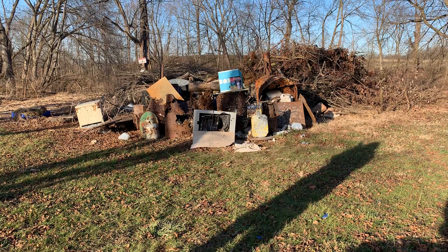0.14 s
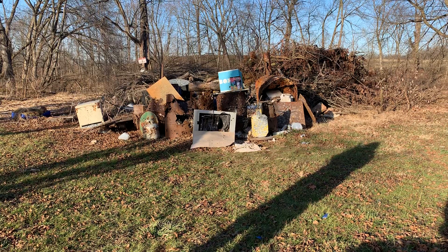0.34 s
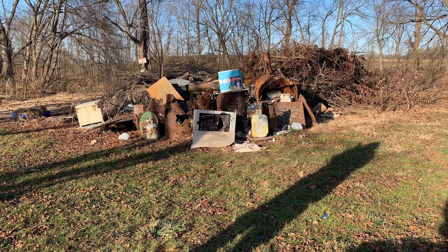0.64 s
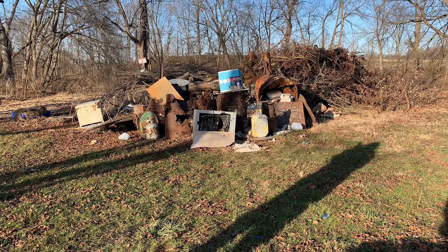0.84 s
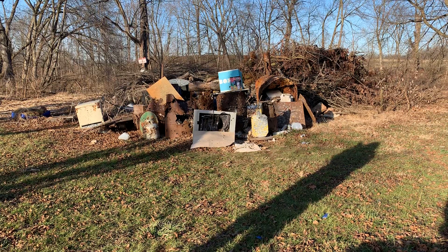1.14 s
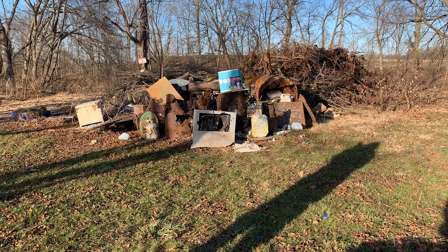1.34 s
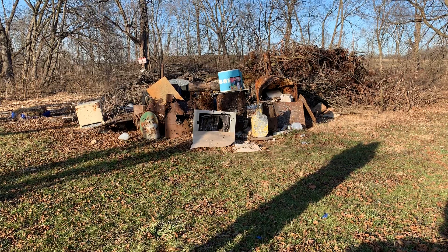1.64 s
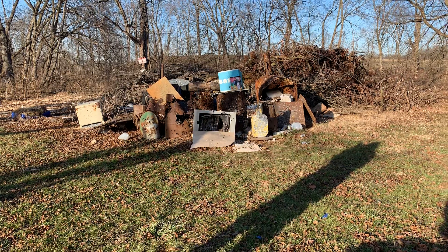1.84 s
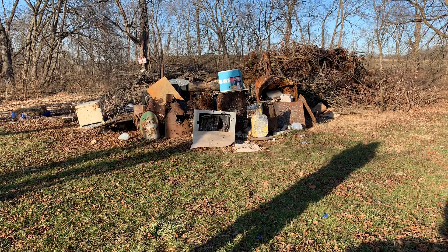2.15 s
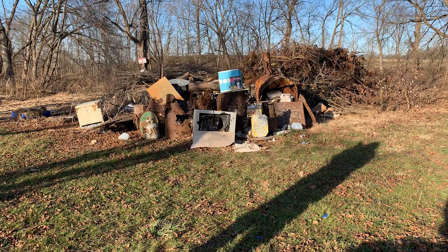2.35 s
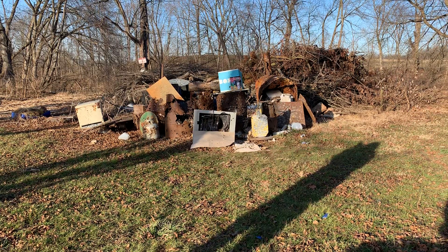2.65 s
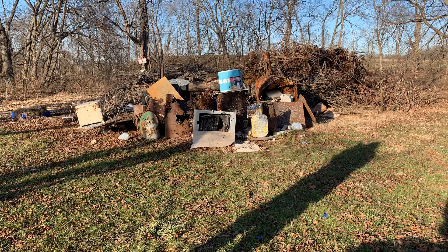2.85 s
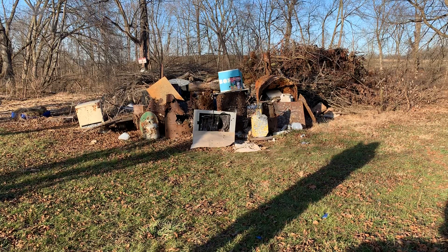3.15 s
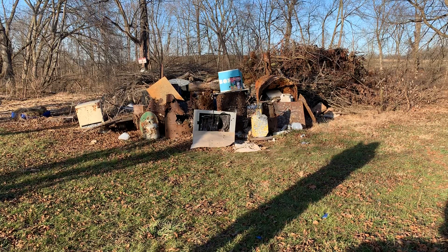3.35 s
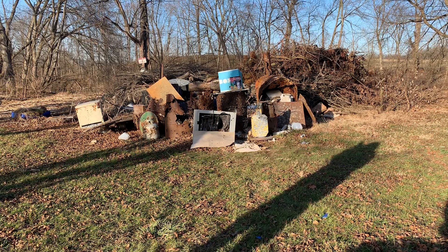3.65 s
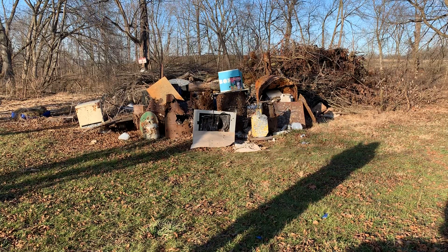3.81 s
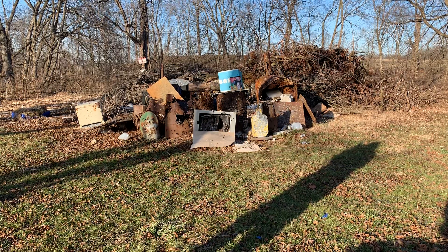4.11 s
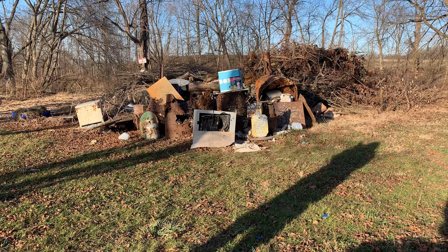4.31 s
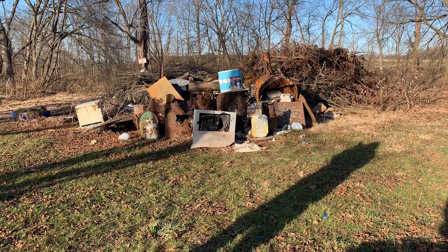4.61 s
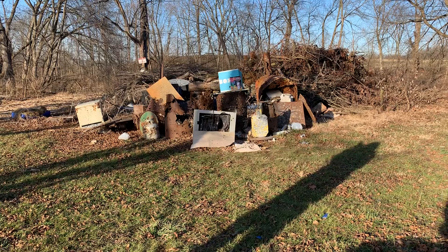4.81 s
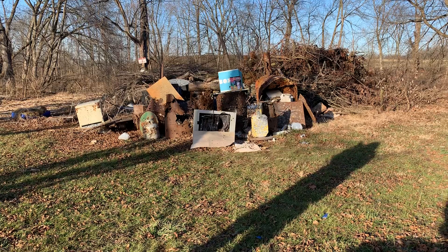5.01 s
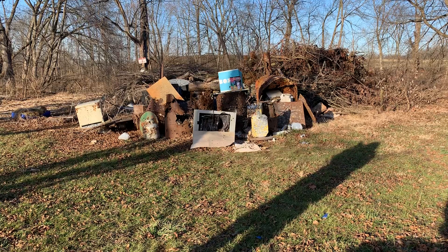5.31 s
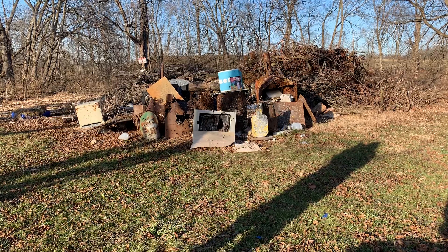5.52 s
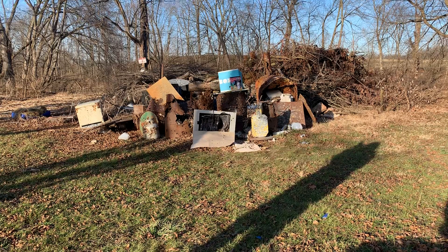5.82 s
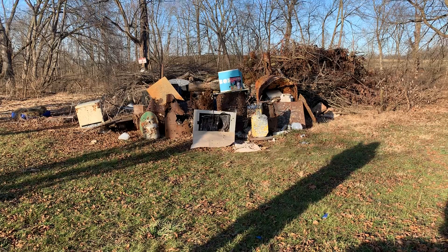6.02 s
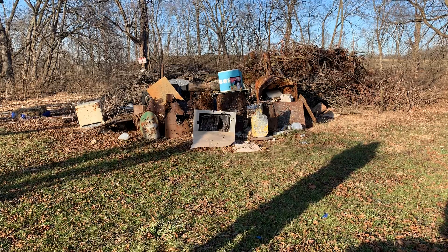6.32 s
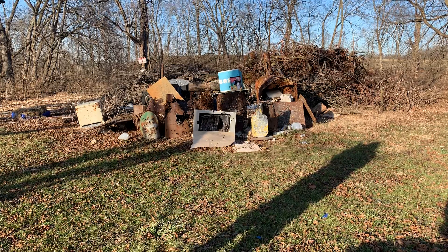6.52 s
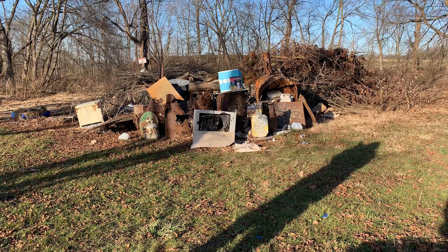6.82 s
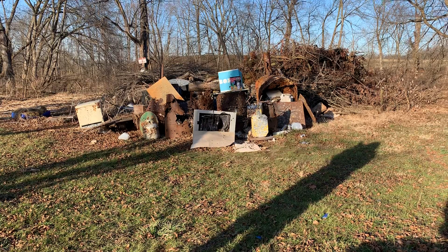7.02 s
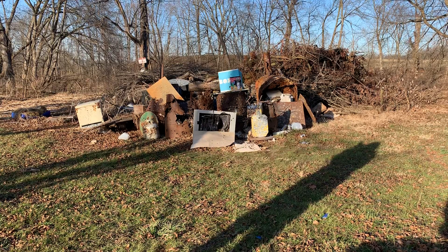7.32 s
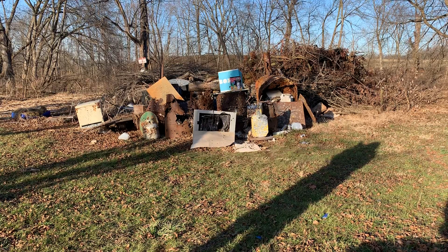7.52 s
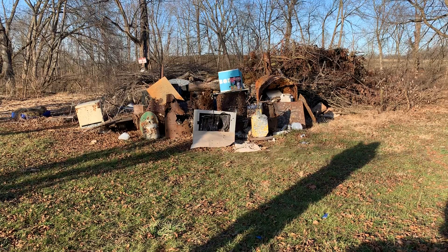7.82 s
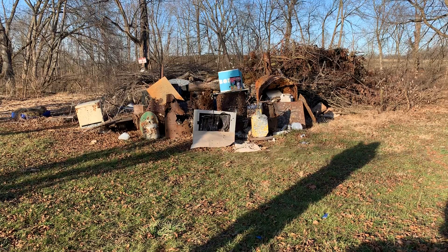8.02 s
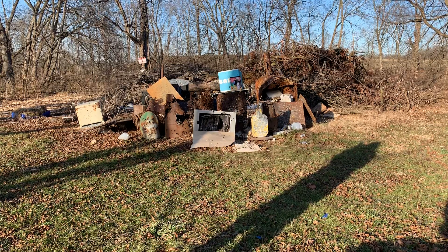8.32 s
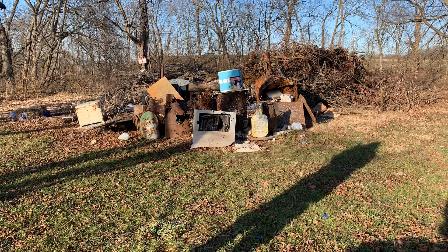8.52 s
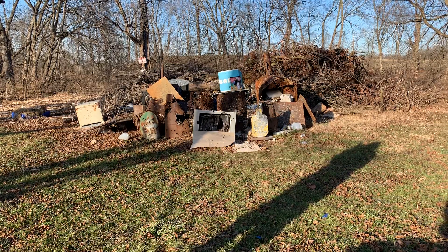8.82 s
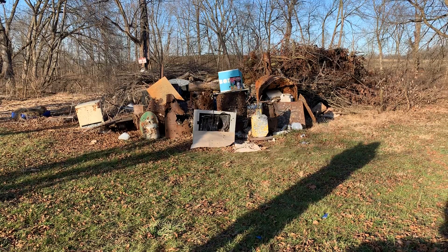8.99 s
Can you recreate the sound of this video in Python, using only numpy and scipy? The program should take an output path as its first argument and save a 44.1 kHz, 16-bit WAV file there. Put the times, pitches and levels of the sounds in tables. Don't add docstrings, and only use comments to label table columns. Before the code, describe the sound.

A small revolver is cocked and fired three times at a junk pile by bare trees, cracks and short scattered echoes over distant road noise.

```python
import sys
import numpy as np
from scipy import signal
from scipy.fft import irfft
from scipy.io import wavfile

SR = 44100
rng = np.random.default_rng(int(sys.argv[2]) if len(sys.argv) > 2 else 0)


def inscribe(sig):
    pcm = np.round(np.clip(np.atleast_2d(sig).T, -1, 1) * 32767)
    wavfile.write(sys.argv[1], SR, pcm.astype(np.int16))


def makeup_ratio(level_db):
    decades = np.asarray(level_db, float) / 20
    return 10 ** decades


N = 403515
RUN_IN = SR
LENGTH = N + RUN_IN
GAIN_DROP_S, GAIN_DROP_DB = 3.12, -14


def at_hz(points, hz):
    table_hz, value = np.transpose(points)
    return np.interp(np.log(hz), np.log(table_hz), value)


def rms_one(x):
    return x / np.sqrt(np.mean(x ** 2) + 1e-20)


def pan(left_db):
    return makeup_ratio(np.array([[left_db / 2], [-left_db / 2]]))


def add(out, x, s):
    i = round(s * SR) + RUN_IN
    out[:, i:i + x.shape[1]] += x[:, :LENGTH - i]


def resonate(x, hz, width_hz):
    r = np.exp(-np.pi * width_hz / SR)
    zeros = np.array([1, 0, -1]) * (1 - r * r) / 2
    poles = [1, -2 * r * np.cos(2 * np.pi * hz / SR), r * r]
    return signal.lfilter(zeros, poles, x)


def low_pass(x, hz, order):
    return signal.sosfilt(signal.butter(order, min(hz, .45 * SR), fs=SR, output="sos"), x)


def burst(noise, t60):
    return noise * makeup_ratio(-60 * np.arange(noise.shape[-1]) / SR / t60)


def drift(rate_hz, size):
    knots = rng.standard_normal(int(size / SR * rate_hz) + 2)
    return np.interp(np.arange(size) / SR * rate_hz, np.arange(len(knots)), knots)


# (frequency [Hz], likeness [-1..1])
LIKENESS_HZ = [(60, 0.9), (130, 0.8), (290, 0.14), (640, -0.44), (1410, -0.27), (3100, 0.19), (6820, -0.85),
               (15000, -0.096)]


def banded(white, spectrum, patchy_db, flicker_hz=9.1, loss_db_s=((20, 0), (20000, 0))):
    out, size, power = 0, white.shape[-1], 0
    later_s = np.arange(size) / SR - .1
    edges_hz = 22 * 2 ** np.arange(0, 9.7, 1 / 3)
    for k, (low, high) in enumerate(zip(edges_hz, edges_hz[1:])):
        hz = np.sqrt(low * high)
        band = signal.butter(2, [low, high], "band", fs=SR, output="sos")
        mid, side = signal.sosfilt(band, white[k % 2])
        alike = np.clip(at_hz(LIKENESS_HZ, hz), -1, 1)
        level_db = at_hz(spectrum, hz)
        gain = makeup_ratio(level_db + patchy_db * drift(flicker_hz, size) - at_hz(loss_db_s, hz) * later_s)
        out = out + gain * (np.sqrt(1 + alike) * mid + np.sqrt(1 - alike) * side * [[1], [-1]])
        power += makeup_ratio(level_db) ** 2 * (high - low) * 4 / SR
    return out / np.sqrt(power)


# (time [s], thump [dB], crack [dB], gas hiss [dB], thump off the pile [dB])
SHOTS = [
    (3.1224, 35.5, -4.5, -26.5, 3.5),
    (5.5037, 37.5, -6.5, -18, 23),
    (7.8212, 38, -5, -19, 24),
]
# (frequency [Hz], density [dB per Hz])
BLAST_HZ_DB = [(290, -32), (500, 0.5), (1600, -4), (1820, -20.5), (2100, -8), (3700, -23.5), (4280, -21.5),
               (4730, -22), (8700, -25), (10400, -24), (16000, -34.5)]
# (blast time [s], left [dB], right [dB])
RECOVERY = [(3.1205, -21.5, -29), (5.5055, -28.5, -33.5), (7.8215, -41.5, -30)]
EARLIER_S, EARLIER_ECHO_DB, ECHO_DB = -.4590, 13, 0.23
CRACK_LEAD_S = .0012
SPIT_DB, GAS_S = -7, .0065


def revolver():
    out, low, echoes, t = np.zeros((2, LENGTH)), thump(), landscape(), np.arange(6000) / SR
    shock = resonate(t == 0, 1400.0, 2000.0)
    add(out, makeup_ratio(EARLIER_ECHO_DB) * echoes, EARLIER_S)
    for s, thump_db, crack_db, hiss_db, pile_db in SHOTS:
        gas = banded(rng.standard_normal((2, 2, 6000)), BLAST_HZ_DB, 0)
        crack = burst(gas, 0.012) - 2.3 * shock * pan(4)
        treble = np.diff(gas[0] + .3 * gas, 2, prepend=[[0, 0]] * 2)
        spit = burst(rms_one(low_pass(treble, 14600, order=12)), .012) * np.minimum(t / .001, 1)
        crack = crack + makeup_ratio(SPIT_DB) * spit
        jet = np.diff(gas[:, ::-1], prepend=0) + .12 * gas
        hiss = rms_one(low_pass(jet, 14000, order=8)) * t / GAS_S * np.exp(1 - t / GAS_S)
        add(out, makeup_ratio(crack_db) * crack + makeup_ratio(hiss_db) * hiss, s - CRACK_LEAD_S)
        add(out, makeup_ratio(thump_db) * low, s)
        add(out, makeup_ratio(pile_db) * low_pass(low, 120., order=2), s + .024)
        add(out, makeup_ratio(ECHO_DB) * echoes, s - CRACK_LEAD_S)
    for s, left_db, right_db in RECOVERY:
        add(out, makeup_ratio(np.array([[left_db], [right_db]])) * t / .013 * np.exp(1 - t / .013), s + .006)
    return out


# (delay [s], lowest all-pass [Hz], highest all-pass [Hz], bass resonance [Hz],
# its Q [1], roll-off [Hz])
PORTS = [
    (.0014, 104, 1227, 76, 2.1, 108),
    (.0010, 180, 688, 84, 2.06, 118),
]


def thump():
    hz, out = np.arange(4097) * SR / 8192 + 1e-3, []
    for delay_s, low_hz, high_hz, bass_hz, q, roll_hz in PORTS:
        corners_hz = np.geomspace(low_hz, high_hz, num=5)
        turns = np.prod([(a - 1j * hz) / (a + 1j * hz) for a in corners_hz], axis=0)
        u = 1j * hz / bass_hz
        bass = u * u / (1 + u / q + u * u)
        colour = bass / (1 + 1j * hz / roll_hz) / (1 + 1j * hz / 1600) ** 2
        out.append(-irfft(np.exp(-2j * np.pi * hz * delay_s) * turns * colour))
    return np.array(out)


# (frequency [Hz], density [dB per Hz])
SCATTER_HZ_DB = [(71, -41), (120, -15.5), (580, -10.5), (839, -7), (1430, -12.5), (1900, -8.5), (3520, -17),
                 (10200, -19), (13900, -31.5), (16000, -77.5)]
# (frequency [Hz], extra loss [dB/s])
AIR_LOSS_HZ_DB_S = [(150, 32), (300, 14), (600, 1.5), (1000, 0.5), (2000, 10), (3500, 34), (6000, 55.5),
                    (10000, 79), (14000, 87)]
# (frequency [Hz], width [Hz], level [dB], t60 [s])
RUMBLE = (43.5, 5, -49.5, 1.4)
# (delay [s], peak [dB], frequency [Hz], length [s], bright part [dB])
ECHOES = [(0.0323, -24, 1285, .02, -10), (0.0336, -28, 3183, .02, -10), (.0385, -23, 888.5, .012, 2),
          (.040, -26.5, 3500, .012, -10), (0.0473, -25.5, 1293, 0.0087, -12.5),
          (.085, -33, 2810, 0.013, -15), (0.162, -33, 1900, .012, -17), (0.185, -31, 790, 0.017, -12),
          (.208, -36.5, 2340, .008, -14), (0.367, -39, 1250, 0.0062, -35), (.5125, -43.5, 1950, .008, -36),
          (0.553, -47, 1100, 0.022, -33), (0.694, -52.5, 755, 0.09, -35), (.740, -50, 750, 0.026, -34)]
THICKETS = 40
LUMPS_DB = 3.5


def landscape():
    size = round(1.6 * SR)
    lag_s = np.arange(size) / SR
    click_db = 2.2 * np.minimum(rng.exponential(1, (2, 1, size)), 5)
    trunks = makeup_ratio(click_db) * rng.choice([-1, 1], (2, 2, size))
    trunks = rms_one(trunks * (rng.random((2, 1, size)) < 3000 / SR))
    scatter = banded(trunks, SCATTER_HZ_DB, LUMPS_DB, 30, AIR_LOSS_HZ_DB_S)
    out = makeup_ratio(wood_db(lag_s)) * low_pass(scatter, 14300, order=12)
    hz, width_hz, db, t60 = RUMBLE
    ground = rng.standard_normal((2, size)) + rng.standard_normal(size)
    ground = resonate(resonate(ground, hz, width_hz), hz, width_hz)
    out += makeup_ratio(db) * burst(rms_one(ground), t60)
    out *= np.clip(lag_s / .035, 0, 1) ** 2 * makeup_ratio(-40 * np.maximum(lag_s - 1.25, 0))
    blips = [(*echo, 1.0) for echo in ECHOES]
    for when, pitch, size_db, side in rng.random((THICKETS, 4)):
        when = .06 + .85 * when
        peak_db = wood_db(when) - 6.0 + 6 * size_db
        blips.append((when, peak_db, 600 * (4.5 - 3 * when) ** pitch, .006, -40, 8 * side - 4))
    for delay_s, peak_db, hz, length_s, bright_db, left_db in blips:
        i = round(delay_s * SR)
        echo = blip(rng.standard_normal(2000), delay_s, hz, length_s, bright_db)
        out[:, i:i + 2000] += makeup_ratio(peak_db) * pan(left_db) * echo
    return out


PILE_S, PILE_DB, PILE_FADE_DB_S = 0.042, -34, 220.5
TREELINE_S, CLEARING_DB, WOOD_DB, WOOD_FADE_DB_S = 0.18, -2.5, -42, 29
FAR_EDGE_S, BEYOND_DB_S = 0.72, 19.5


def wood_db(lag_s):
    pile = PILE_DB - PILE_FADE_DB_S * abs(lag_s - PILE_S)
    trees = WOOD_DB - WOOD_FADE_DB_S * np.maximum(lag_s - TREELINE_S, 0)
    trees = trees - BEYOND_DB_S * np.maximum(lag_s - FAR_EDGE_S, 0)
    trees = trees + CLEARING_DB * np.clip((TREELINE_S - lag_s) / 0.027, 0, 1)
    return 10 * np.log10(makeup_ratio(pile) ** 2 + makeup_ratio(trees) ** 2)


ECHO_WIDTH = .75


def blip(noise, delay_s, hz, length_s, bright_db):
    puff = burst(noise, length_s) * np.minimum(np.arange(len(noise)) / SR / .0008, 1)
    body = puff
    for _ in range(3):
        body = resonate(body, hz, ECHO_WIDTH * hz)
    bright = low_pass(np.diff(puff, prepend=0), 15000 * np.exp(-delay_s / .4), order=4)
    return body / abs(body).max() + makeup_ratio(bright_db) * bright / abs(bright).max()


# (blast time [s], rise [s], fall [s], dull part [dB], bright part [dB])
SWELLS = [(3.1231, 0.026, 0.0072, -13, -5.5), (5.5030, 0.030, .002, -25, -22.5),
          (7.8210, 0.027, .002, -18, -16.5)]
DULL_HZ, BRIGHT_HZ, TOP_BAND_HZ, TOP_BAND_DB = 330, 2270, 5700, -8.5
SHELF_DB = -24.5


def swell_before_blast():
    out, before_s = np.zeros((2, LENGTH)), np.arange(1800)[::-1] / SR
    for s, rise_s, fall_s, dull_db, bright_db in SWELLS:
        noise = rng.standard_normal((2, 2, 1800))
        dull = resonate(noise[0], DULL_HZ, 1.7 * DULL_HZ)
        dull = rms_one(resonate(dull, DULL_HZ, 1.7 * DULL_HZ))
        bands = resonate(noise[1], BRIGHT_HZ, 0.2 * BRIGHT_HZ)
        bands = bands - makeup_ratio(TOP_BAND_DB) * resonate(noise[1], TOP_BAND_HZ, 1500.)
        bright = rms_one(low_pass(bands, 8200., order=24)) * makeup_ratio(np.array([[-16.], [0]]))
        slope = np.sin(np.pi / 2 * np.clip(1 - before_s / rise_s, 0, 1))
        swell = (slope ** 8.0 + makeup_ratio(SHELF_DB) * slope) * np.clip(before_s / fall_s, 0, 1)
        add(out, (makeup_ratio(dull_db) * dull + makeup_ratio(bright_db) * bright) * swell, s - 1800 / SR)
    return out


# (frequency [Hz], density [dB per Hz])
STEEL_HZ_DB = [(1290, -49), (2200, -7), (2660, -12.5), (5860, -15), (10100, -7), (12000, -18),
               (13700, 12.5), (16000, -32.5)]
# (frequency [Hz], level [dB], t60 [s])
FRAME = [(7100, -12, .015), (9130, -6, .07), (9830, 0, .05), (10300, -4, .025)]


def cocking():
    out, t = np.zeros((2, LENGTH)), np.arange(9000) / SR
    steel = banded(rng.standard_normal((2, 2, 12000)), STEEL_HZ_DB, 0)
    for k, (s, peak_db, ring_db, tail_s, left_db, tail_db) in enumerate(contacts()):
        noise = np.roll(steel, 431 * k, axis=1)[:, :9000]
        ring = 0
        for hz, db, t60 in FRAME:
            a, b = rng.standard_normal(2)
            ring = ring + makeup_ratio(db + 1.6 * a - 60 * t / t60) * np.sin(2 * np.pi * hz * t + 3 * b)
        snap = burst(noise[0] + 0.48 * noise, 0.015) * np.minimum(t / 0.0014, 1)
        snap = snap + makeup_ratio(tail_db) * burst(noise, tail_s)
        add(out, makeup_ratio(peak_db) * pan(left_db) * (makeup_ratio(-2.5) * snap + makeup_ratio(ring_db) * ring), s)
    return out


# (cylinder stop [s], time to the sear [s], stop [dB], sear [dB], frame ring [dB])
COCKS = [
    (0.3464, .0444, -31, -27.5, -23),
    (3.8138, .0589, -48.5, -38, -15),
    (6.105, .0534, -47, -39, -18),
    (8.4482, .0569, -43.5, -36.5, -36),
]
# (time [s], peak [dB])
PAWL = [(-.039, -66), (-.0315, -59)]
# (time [s], peak [dB], frame ring [dB], tail [dB])
HANDLING = [(.2824, -72, -24, -28), (.5184, -66, -24, -29), (0.557, -62.5, -1.5, -29),
            (.5866, -63.5, -10, -26), (.6644, -67, -28, -28), (1.7001, -46, -34, -8),
            (2.2344, -68, -30, -10), (4.0024, -73, -16, -28), (4.0464, -78, -6, -28),
            (4.0694, -78, -8, -26), (8.6496, -48.5, -41, -27)]
STOP, SEAR, TICK = (0.36, -2.5, -18.5), (0.21, -4, -24), (.2, -3.5, -23)   # (tail [s], left-right [dB], tail [dB])
TICK_RING_DB, STOP_RING_DB = -19.5, -7
LATER_PAWL_DB = -6.5


def contacts():
    rows = [(s, db, ring_db, *TICK[:2], tail_db) for s, db, ring_db, tail_db in HANDLING]
    for s, draw_s, stop_db, sear_db, ring_db in COCKS:
        rows.append((s, stop_db, ring_db + STOP_RING_DB, *STOP))
        rows.append((s + draw_s, sear_db, ring_db, *SEAR))
        later_db = LATER_PAWL_DB * (s > GAIN_DROP_S)
        rows += [(s + ahead_s, db + later_db, TICK_RING_DB, *TICK) for ahead_s, db in PAWL]
    return rows


# (frequency [Hz], density [dB per Hz])
TRAFFIC_HZ_DB = [(13, -40), (22, -14), (80, 2.5), (122, -7), (228, -10.5), (311, -26), (435, -18),
                 (600, -17.5), (700, -12), (968, -12.5), (1350, -19), (2200, -22.5), (3000, -53.5),
                 (4500, -66.5)]
# (frequency [Hz], level re traffic [dB], width [Hz])
HUM = [
    (471, -24, 10),
    (732, -29.5, 14),
    (217, -18, 32),
    (417, -25.5, 74),
]
# (time [s], half length [s], rise [dB])
WHINE = [(4.903, .45, 11.5), (7.2, .3, 9)]
TRAFFIC_DB, TRAFFIC_FADE_DB_S = -53, 0.11
RUSTLE_DB = -38.5


def traffic():
    white = rng.standard_normal((2, 2, LENGTH))
    t = np.arange(LENGTH) / SR - 1
    near_db = sum(rise_db * np.exp(-((t - s) / half_s) ** 2) for s, half_s, rise_db in WHINE)
    lines = []
    for hz, db, width_hz in HUM:
        line = resonate(resonate(white[0, 0], hz, width_hz), hz, width_hz)
        lines.append(makeup_ratio(db + 2.0 * drift(1.4, LENGTH)) * rms_one(line))
    motors = makeup_ratio(near_db) * lines[0] + sum(lines[1:])
    rustle = makeup_ratio(RUSTLE_DB) * low_pass(np.diff(white[1], prepend=0), 13300., order=16)
    level_db = TRAFFIC_DB - TRAFFIC_FADE_DB_S * t + GAIN_DROP_DB * (t > GAIN_DROP_S)
    return makeup_ratio(level_db) * pan(-1.6) * (banded(white, TRAFFIC_HZ_DB, 1.5) + motors + rustle)


# (time [s], length [s], start [Hz], top [Hz], end [Hz])
BIRD = [(1.99, .12, 7550, 8700, 7600), (2.513, 0.15, 7200, 8450, 8200)]
BIRD_DB, BIRD_TOP_AT = -99, .62


def bird():
    out = np.zeros((2, LENGTH))
    for s, length_s, start_hz, top_hz, end_hz in BIRD:
        share = np.arange(0, 1, 1 / (length_s * SR))
        arc = np.sin(np.pi / 2 * np.interp(share, [0, BIRD_TOP_AT, 1], [0, 1, 2]))
        span_hz = np.where(share < BIRD_TOP_AT, top_hz - start_hz, top_hz - end_hz)
        hz = top_hz - (1 - arc) * span_hz
        add(out, makeup_ratio(BIRD_DB) * np.sin(2 * np.pi * np.cumsum(hz) / SR)[None], s)
    return out


def scene():
    return (revolver() + swell_before_blast() + cocking() + traffic() + bird())[:, RUN_IN:]


def roll_off(x):
    return signal.sosfilt(signal.butter(12, 16830, fs=SR, output="sos"), x)


def record(dry):
    dip_hz, dip_width_hz = 11800, 1300
    peak_hz, peak_width_hz, peak_share = 10000, 1500, .5
    ported = dry + peak_share * resonate(dry, peak_hz, peak_width_hz)
    for _ in range(2):
        ported = ported - resonate(ported, dip_hz, dip_width_hz)
    limited = 1.222 * np.tanh(low_pass(ported, 15600, order=10) / 1.096)
    return roll_off(limited)


dry = scene()
out = record(dry)
inscribe(out)
```